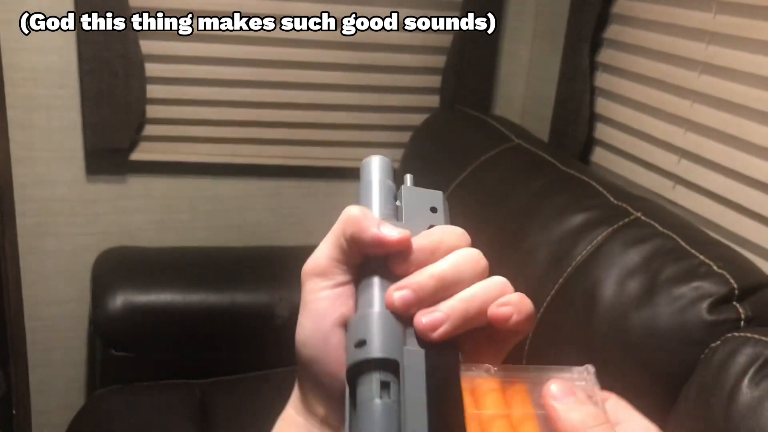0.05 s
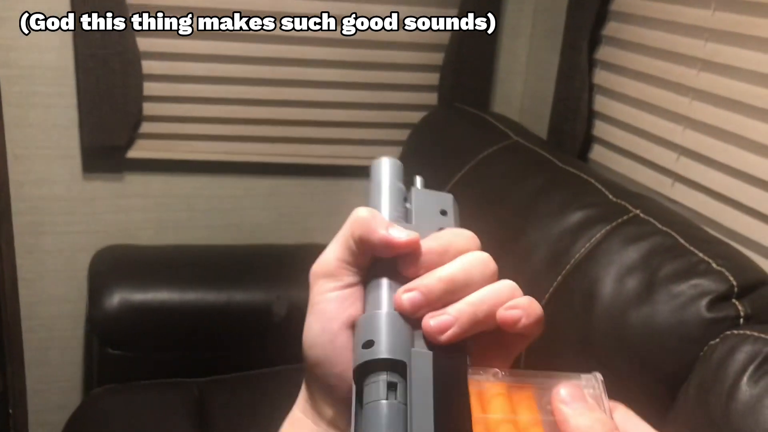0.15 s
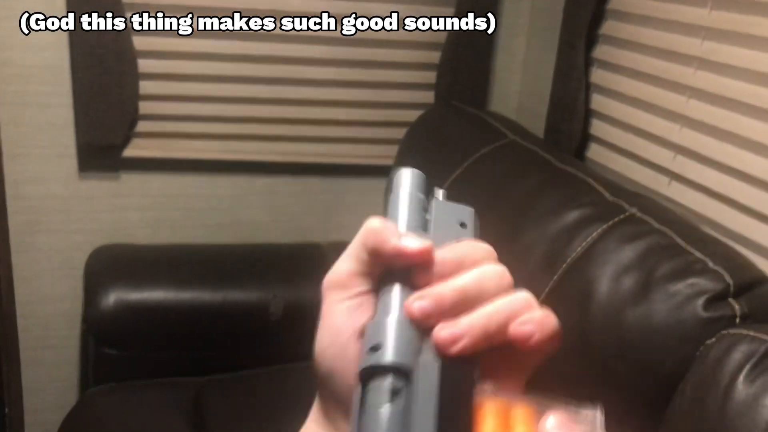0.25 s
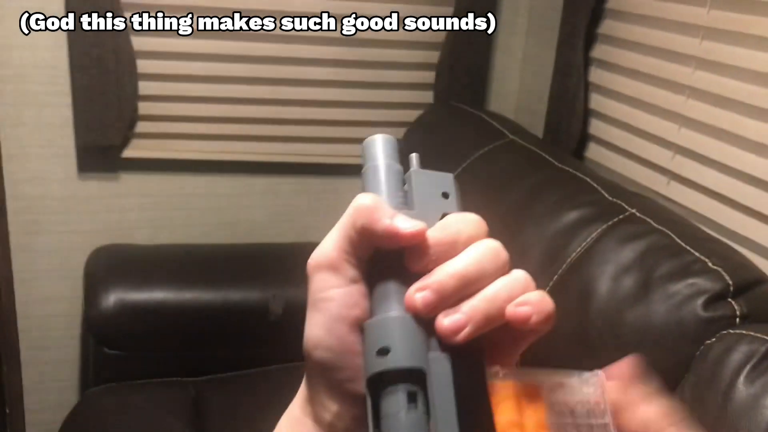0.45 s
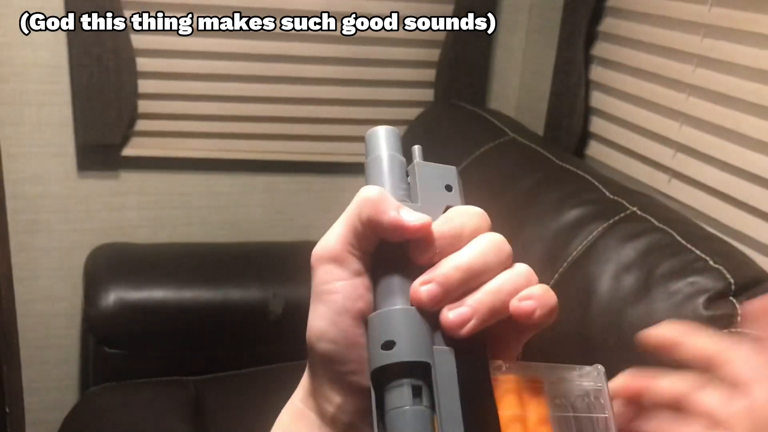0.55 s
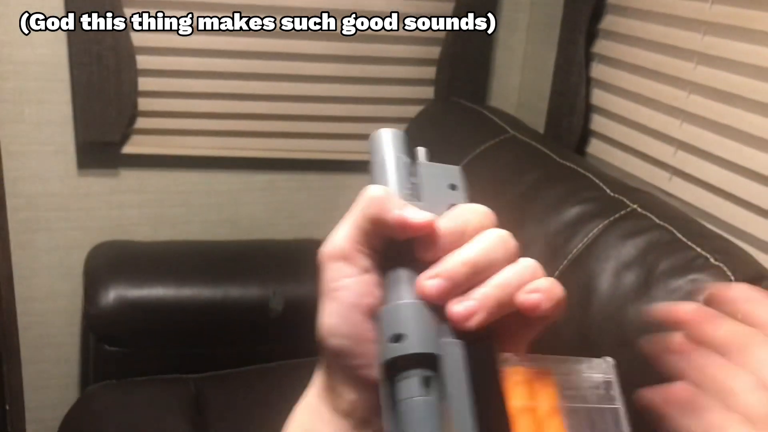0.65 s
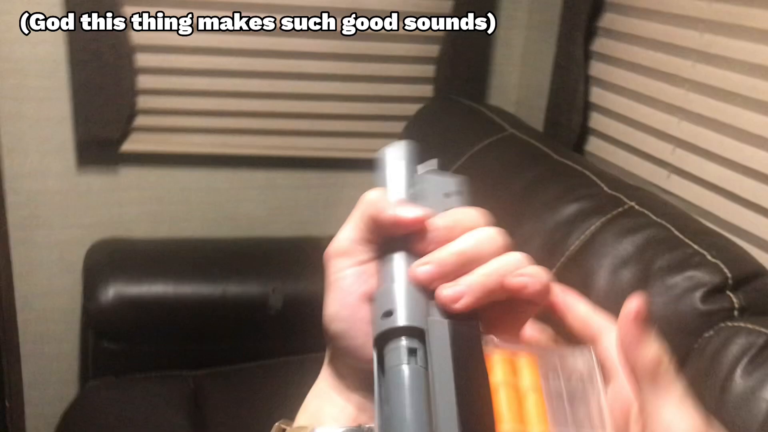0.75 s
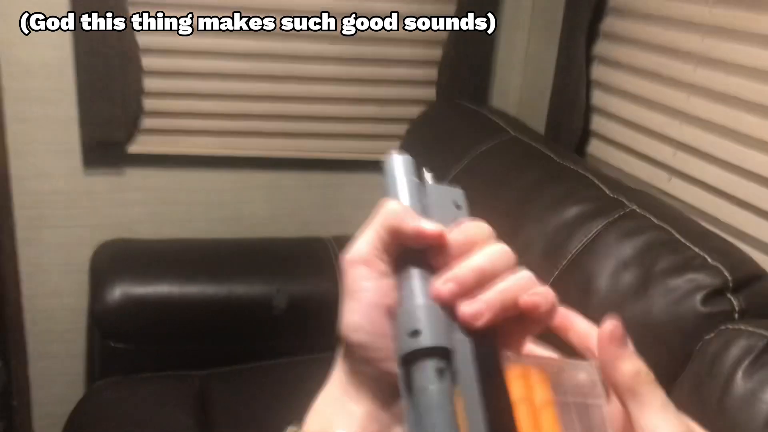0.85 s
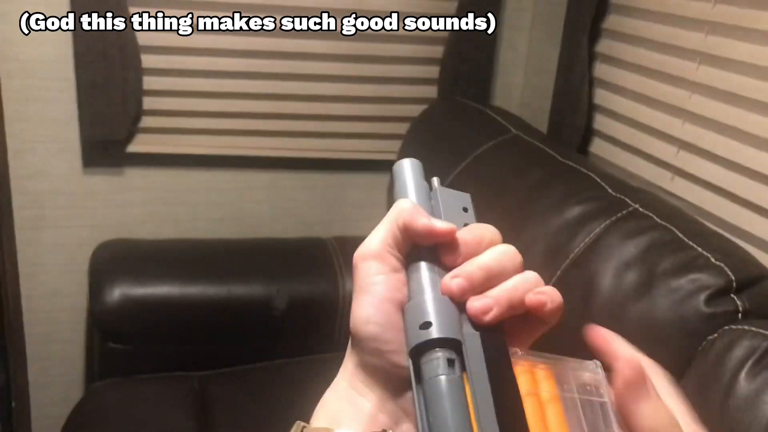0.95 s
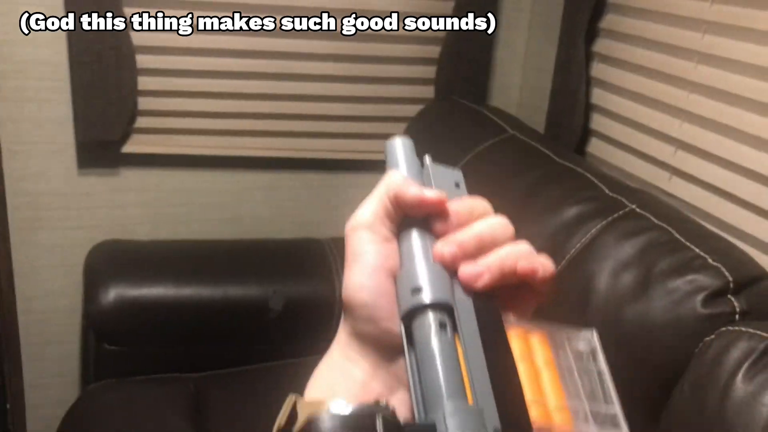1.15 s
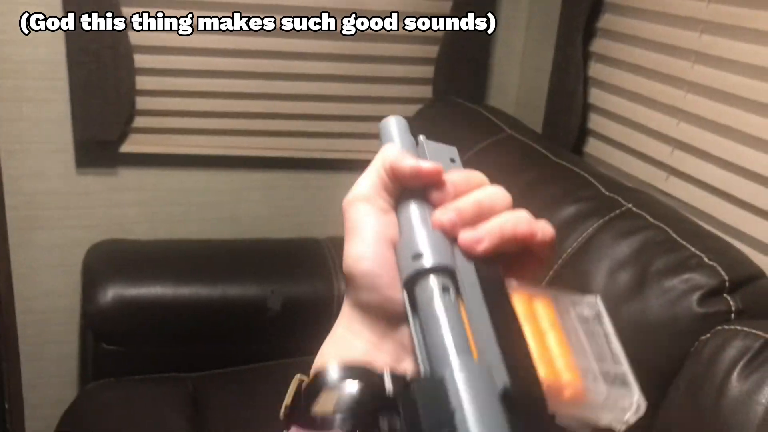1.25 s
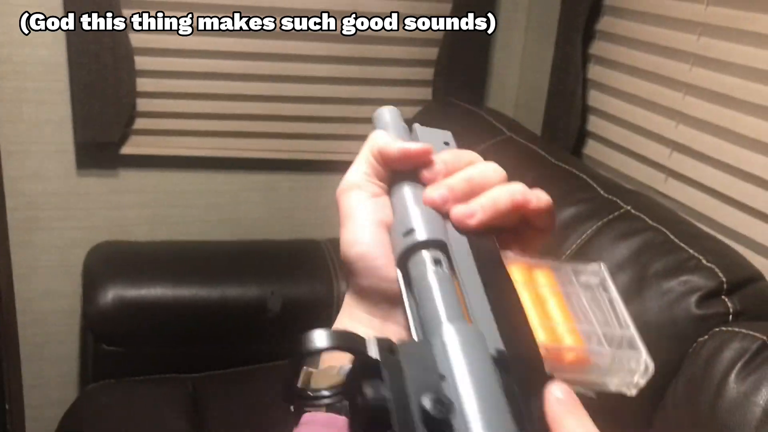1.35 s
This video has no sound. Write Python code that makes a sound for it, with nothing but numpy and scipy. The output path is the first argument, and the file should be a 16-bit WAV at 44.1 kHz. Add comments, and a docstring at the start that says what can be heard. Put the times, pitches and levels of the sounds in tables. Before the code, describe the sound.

A toy blaster's plastic magazine clacks sharply twice, close to the microphone. The first hollow clack comes at about 0.25 seconds, followed by small ticks and a soft thud. A tiny squeak leads into the second clack at 0.75 seconds. A lighter click follows at 0.85, then faint ticks and hand rubs until about 1.4. The quiet living room rings briefly, over faint rumble, hiss and thin whines.

```python
"""Low rumble, hiss and a few faint wavering whines fill a quiet living room. Close to the microphone,
the plastic magazine of a toy blaster is worked by hand and clacks twice, half a second apart.
Each clack is a quick run of contacts between catch, magazine and hollow shell, which cracks and rings.
Small ticks, rubs of the hand and soft thuds surround the clacks; the sliding magazine squeaks
just ahead of the second one. The room rings briefly."""
import sys
import numpy as np
from scipy import signal
from scipy.fft import rfft, irfft, next_fast_len
from scipy.io import wavfile

SR = 44100
rng = np.random.default_rng(int(sys.argv[2]) if len(sys.argv) > 2 else 0)


def output_pcm(signal):
    """Save a mono or channel-first signal as 16-bit PCM at the path in sys.argv[1].

    Samples are clipped to [-1, 1] before scaling.
    """
    pcm = np.clip(np.atleast_2d(signal).T, -1, 1) * 32767
    wavfile.write(sys.argv[1], SR, np.round(pcm).astype(np.int16))


N = 61739
T = np.arange(N) / SR

# spectrum of the plastic's crowded, quickly damped modes: frequency_hz, gain_db
PLASTIC_SPECTRUM = [(60, -29.5), (170, -25), (400, -11.5), (900, -2.5), (1500, -5), (2000, -8),
                    (2800, -1.5), (4000, -2.5), (6500, -4), (9200, -7.5), (10500, -11.5), (13000, -10.5),
                    (16000, -21)]


def from_db(db):
    """Decibels to gain."""
    return 10 ** (np.asarray(db) / 20)


def unit(x):
    """Scale to an energy of one."""
    return x / np.sqrt(np.sum(x ** 2) + 1e-20)


def at_hz(points, hz, column=1):
    """Read one column of a table on a log-frequency axis."""
    table = np.array(points)
    return np.interp(np.log(np.maximum(hz, 1)), np.log(table[:, 0]), table[:, column])


def colour(x, spectrum):
    """Causal (minimum-phase) filter through points of frequency_hz, gain_db."""
    size = 2 * next_fast_len(len(x))
    bins_hz = np.arange(size // 2 + 1) * SR / size
    cepstrum = irfft(np.log(from_db(at_hz(spectrum, bins_hz))))
    cepstrum[1:size // 2] *= 2
    cepstrum[size // 2 + 1:] = 0
    return irfft(rfft(x, size) * np.exp(rfft(cepstrum)))[:len(x)]


def add(out, start_s, x):
    """Mix a sound in at start_s."""
    i = int(start_s * SR)
    out[i:i + len(x)] += x[:N - i]


def drift(count):
    """A random curve through count points spread over the scene."""
    return np.interp(T, np.linspace(0, T[-1], count), rng.standard_normal(count))


def gate(start_s, end_s, fade_s):
    """A gain that opens and closes with straight fades."""
    return np.clip(np.minimum(T - start_s, end_s - T) / fade_s, 0, 1)


def sine(pitch_hz):
    """A sine that follows a pitch curve."""
    return np.sin(2 * np.pi * np.cumsum(pitch_hz) / SR)


def room_tone(floor_db=-64.5, waver=.011, swell_db=4):
    """Steady rumble and hiss, with thin wavering whines that come and go."""
    # spectrum of the rumble and hiss: frequency_hz, relative_db
    floor_spectrum = [(20, -31), (40, -12), (65, -1), (100, -5.5), (200, -16.5), (400, -19.5),
                      (1000, -24.5), (2200, -29), (4000, -31), (7000, -38), (16000, -39.5)]
    # faint whines: start_s, end_s, pitch_hz, level_db
    whines = [(-.1, .72, 970, -75.5), (-.1, .72, 1940, -76), (0, .62, 4500, -86.5), (.9, 1.36, 980, -79),
              (.9, 1.3, 1960, -83.5), (1.05, 1.6, 1420, -80), (1.06, 1.24, 3460, -75),
              (1.15, 1.46, 3205, -80), (1.05, 1.2, 4440, -80), (1.361, 1.5, 4150, -76.5)]
    out = from_db(floor_db) * np.sqrt(N) * unit(colour(rng.standard_normal(N), floor_spectrum))
    for start_s, end_s, pitch_hz, level_db in whines:
        whine = np.sqrt(2) * sine(pitch_hz * (1 + waver * drift(count=140)))
        swell = from_db(level_db + swell_db * drift(count=80))
        out += swell * gate(start_s, end_s, fade_s=.0394) * whine
    return out


def magazine_clacks(crack_t60_s=.012, tail_t60_s=.074, tail_db=-13):
    """Every contact cracks and sets the shell ringing; the place struck decides which modes answer."""
    # contacts of the magazine: start_s, level_db, thump_db, knock_db, treble_db, place (0 catch, 1 well)
    contacts = [(.049, -26, 0, 7.5, -20, 0.25), (.2243, -30, -3, -9.5, -2, 0),
                (0.2342, -14.5, 2, 7.5, -9.5, 0), (0.2384, -17, -6.5, -2, -7, 0),
                (0.2405, 4.5, -9, -4.5, -10, 0.61), (0.2417, 3.5, -5.5, -5.5, -5, 0),
                (0.247, 15, -5.5, -8, 0, 0.037), (0.2495, 17.5, 2.5, -3.5, 0.5, 0.086),
                (.2530, 13.5, 2, -0.5, 2, 0.23), (0.2591, 10, -4.5, -4, 1.5, 0),
                (0.2619, 16, -9, -5, -2.5, 0), (0.2634, 6.5, 2, 8.5, -5, 0), (.3940, -18, 1, 0, -10, .3),
                (.3982, -11.5, -3.5, -5.5, -11.5, 0.35), (.4005, -15, 1, -7.5, -21, 0.47),
                (.4140, -31.5, 26.5, 7, -13, 0.66), (.4230, -32, 21, 13, -4, 1),
                (0.4375, -27, 8, 8, -9, 0.71), (.4422, -21.5, 11, 8.5, 0, 0.48),
                (0.452, -18, 9.5, 3.5, -14, 0.83), (0.4698, -31.5, 14, 9, -3, 0.3),
                (0.5463, -20.5, -2, -3.5, -26.5, .5), (0.7213, -18, -8.5, -8.5, -8.5, 0.93),
                (0.7328, -25, 0, -4.5, -4.5, 1), (0.7382, -13.5, -8, -11.5, -13, 0.95),
                (0.7432, 17, -8.5, -2.5, -1.5, 0.73), (.7446, 20, -5, -4.5, -5.5, 0.99),
                (0.7476, 17.5, 1, 3.5, -7, 0.73), (0.7522, 6, -2, 5.5, -1.5, 1),
                (0.7627, 14, -6, -7, 1.5, 0.9), (0.7654, 6.5, 10, 1.5, 3.5, 0.92),
                (0.8507, -9, -3, 9, -7.5, 0.91), (0.8591, -13.5, 10.5, 13, -9, 1),
                (1.0259, -25, -3.5, 2, 6.5, 0.72), (1.2450, -34.5, -2, -3, -3.5, .5)]
    # modes of the hollow shell: pitch_hz, t60_s, catch_db, well_db (level when struck at each place)
    shell_modes = [(343, 0.042, -14, -1.5), (457, 0.02, -2.5, -15), (600, 0.034, -7, -6.5),
                   (781, .03, -4, -7), (996, 0.026, -5.5, -1.5), (1261, 0.04, 1, -7.5),
                   (1617, .03, -11, -3), (2396, 0.013, -5.5, -4), (2670, 0.08, -8.5, -2),
                   (2868, .06, 1, -1.5), (3176, 0.062, -0.5, -0.5), (3442, 0.022, 0, -2.5),
                   (4260, 0.062, 0, -5), (4640, 0.07, -6.5, -2.5), (5040, 0.054, -2, -5),
                   (5680, 0.036, -4, -4), (6580, .05, -3, -2), (7170, 0.045, -4, -0.5),
                   (8320, 0.053, -5.5, -6)]
    thump_hz, knock_hz, treble_hz = 367, 1030, 8750
    t = T[:SR // 8]
    cracks, rings = np.zeros(N), np.zeros(N)
    crack_decay = from_db(-60 * t / crack_t60_s) + from_db(tail_db - 60 * t / tail_t60_s)
    for start_s, level_db, thump_db, knock_db, treble_db, place in contacts:
        tone = [(thump_hz, thump_db), (knock_hz, knock_db), (2100, 0), (4200, 0), (treble_hz, treble_db)]
        ring = np.zeros(len(t))
        for k, (pitch_hz, t60_s, catch_db, well_db) in enumerate(shell_modes):
            damping = np.log(1000) / t60_s
            resonance = from_db(catch_db + place * (well_db - catch_db))
            amplitude = (-1) ** k * 2 * damping / SR * resonance  # neighbouring modes alternate in sign
            ring += amplitude * np.sin(2 * np.pi * pitch_hz * t) * np.exp(-damping * t)
        crack = unit(crack_decay * rng.standard_normal(len(t)))
        add(rings, start_s, from_db(level_db) * colour(ring, tone))
        add(cracks, start_s, from_db(level_db) * colour(crack, tone))
    return rings + colour(cracks, PLASTIC_SPECTRUM)


def room_reverb(direct, delay_s=.0043, build_s=.005):
    """The living room returns a diffuse tail that builds in milliseconds and dies sooner in the treble."""
    # reverberation of the room: frequency_hz, level_db, t60_s
    reverb_bands = [(100, -13.5, .3), (400, -18.5, .25), (897.4, -13, 0.18), (2500, -17, .215),
                    (6000, -15.5, .19), (10000, -14, 0.13), (16000, -18, .13)]
    t, edges_hz = T[:SR // 2], np.geomspace(60, 18000, 13)
    white, tail = rng.standard_normal((2, len(t))), np.zeros(len(t))
    build = 1 - np.exp(-np.maximum(t - delay_s, 0) / build_s)
    for k, (low, high) in enumerate(zip(edges_hz, edges_hz[1:])):
        centre_hz = np.sqrt(low * high)
        band = signal.sosfilt(signal.butter(2, [low, high], "band", fs=SR, output="sos"), white[k % 2])
        decay = from_db(-60 * t / at_hz(reverb_bands, centre_hz, column=2))
        gain = from_db(at_hz(reverb_bands, centre_hz)) * np.sqrt(2 * (high - low) / SR)
        tail += gain * unit(band * build * decay)
    return signal.fftconvolve(direct, tail)[:N]


def hand_rubs(grain_db=4, grain_samples=64):
    """Hand and magazine rub over the shell in short grainy swells."""
    # slides on the plastic: centre_s, half_length_s, level_db
    rubs = [(.240, .005, -32), (.435, .028, -63), (1.30, .05, -66), (1.347, .012, -54)]
    swell = sum(from_db(level_db) * np.exp(-.5 * ((T - centre_s) / half_length_s) ** 2)
                for centre_s, half_length_s, level_db in rubs)
    grain_gains = from_db(grain_db * rng.standard_normal(N // grain_samples + 1))
    grain = np.repeat(grain_gains, grain_samples)[:N]
    return colour(swell * grain * rng.standard_normal(N), PLASTIC_SPECTRUM)


def blaster_thuds(pitch_hz=68.53, t60_s=.1, rise_s=.011):
    """The whole blaster jolts in the hand with a soft low thud."""
    # jolts of the blaster: start_s, level_db
    jolts = [(0.256, -46), (0.544, -49), (.755, -58)]
    out, t = np.zeros(N), T[:SR // 3]
    envelope = (1 - np.exp(-t / rise_s)) * from_db(-60 * t / t60_s)
    thud = envelope * np.sin(2 * np.pi * pitch_hz * t)
    for start_s, level_db in jolts:
        add(out, start_s, from_db(level_db) * thud)
    return out


def magazine_squeak(start_s=.724, end_s=.743, pitch_hz=3100, roughness=.012):
    """The magazine squeaks briefly as it slides home, swelling until it stops."""
    final_db, rise_db_per_s = -35, 1300
    swell = from_db(final_db + rise_db_per_s * np.minimum(T - end_s, 0))
    rough_tone = sine(pitch_hz * (1 + roughness * drift(count=900)))
    return swell * gate(start_s, end_s, fade_s=.002) * rough_tone


def scene():
    """One microphone close to the blaster, with the living room behind it."""
    blaster = magazine_clacks() + hand_rubs() + magazine_squeak()
    return (blaster + room_reverb(blaster) + blaster_thuds() + room_tone())[None]


def record(dry, ceiling=.8, cutoff_hz=15850):
    """The highest peaks are rounded and the top of the treble is cut steeply."""
    rounded = ceiling * np.tanh(dry / ceiling)
    return signal.sosfilt(signal.ellip(10, .1, 75, cutoff_hz, fs=SR, output="sos"), rounded)


dry = scene()
out = record(dry)
output_pcm(out)
```